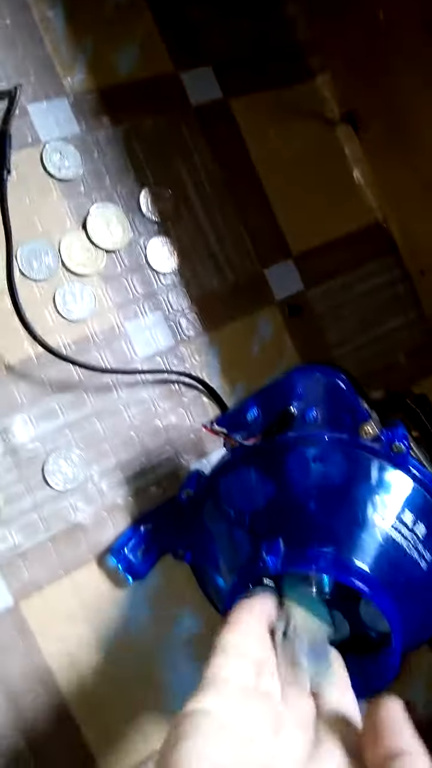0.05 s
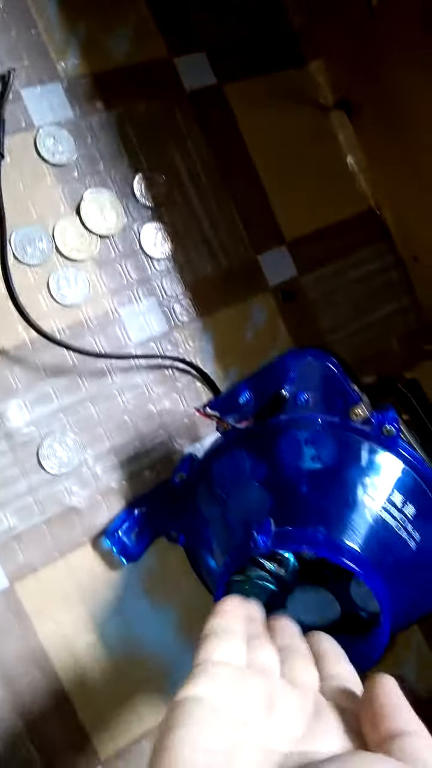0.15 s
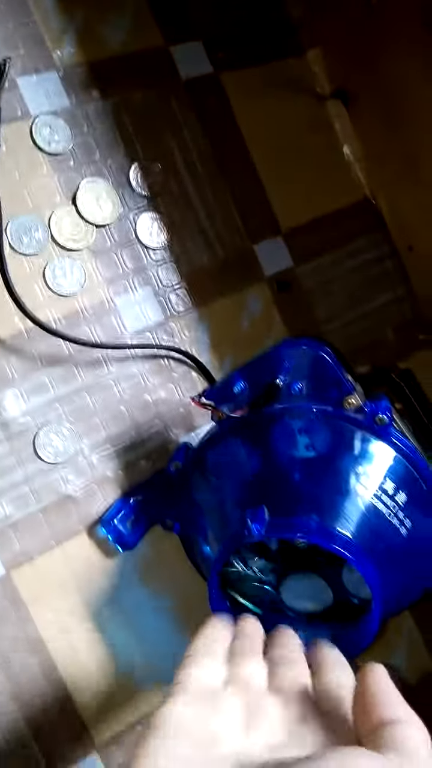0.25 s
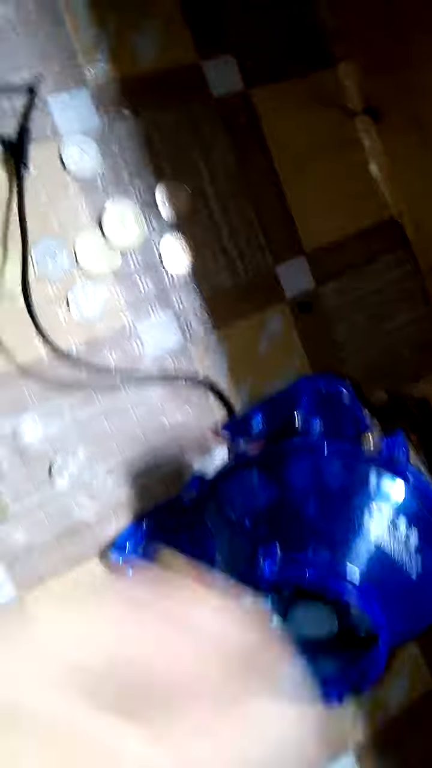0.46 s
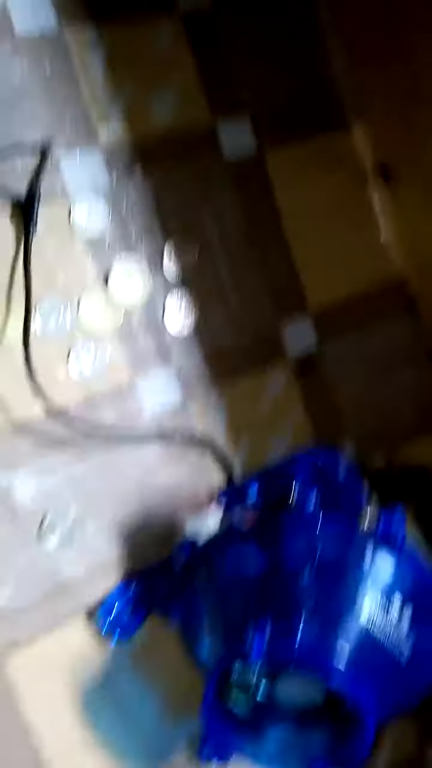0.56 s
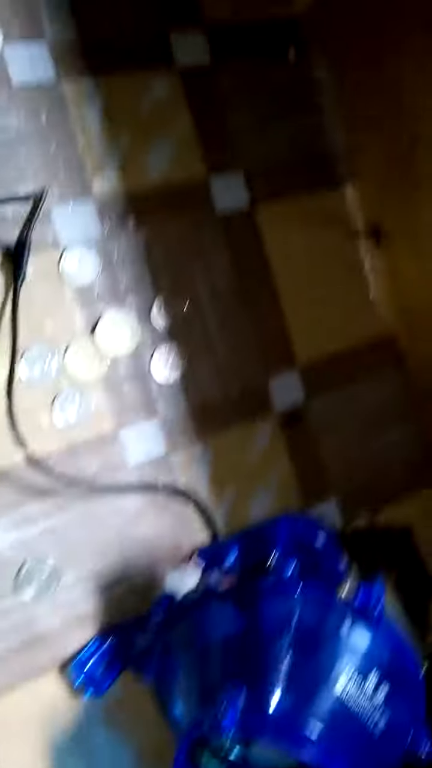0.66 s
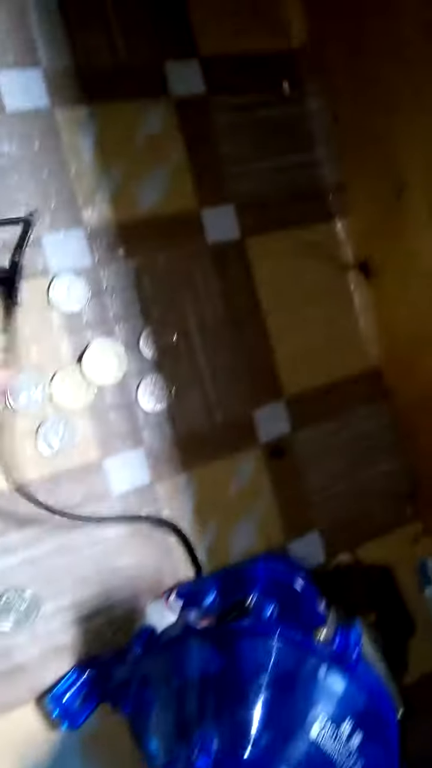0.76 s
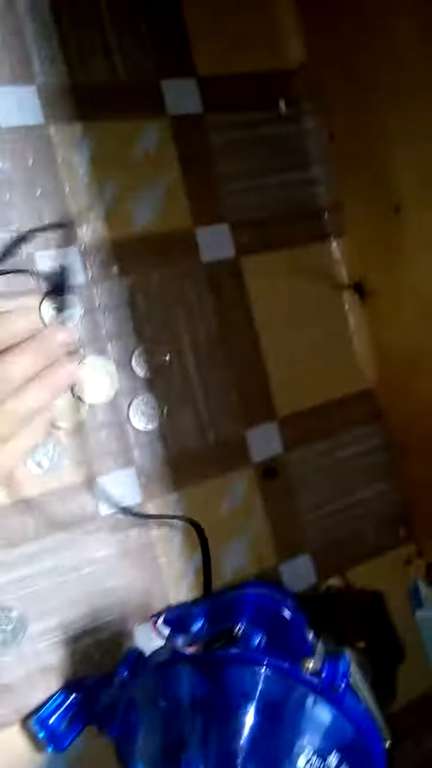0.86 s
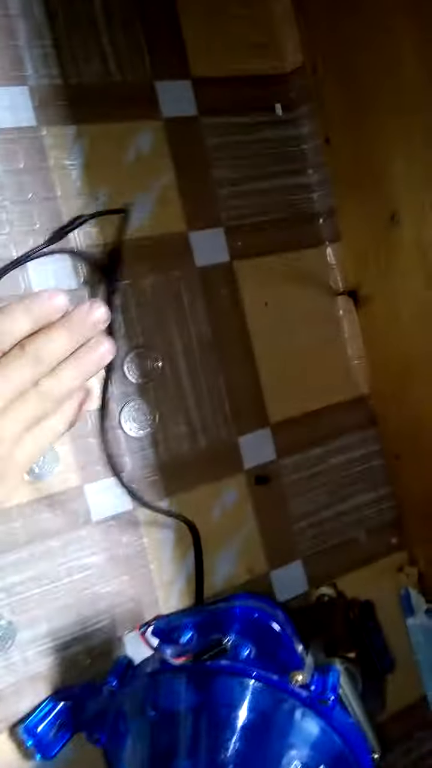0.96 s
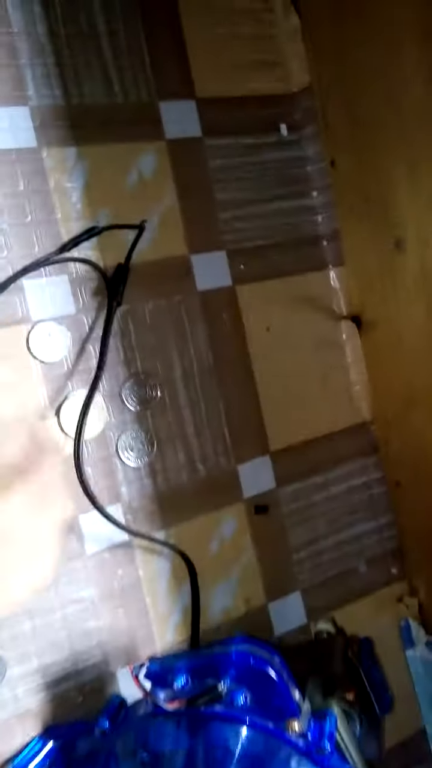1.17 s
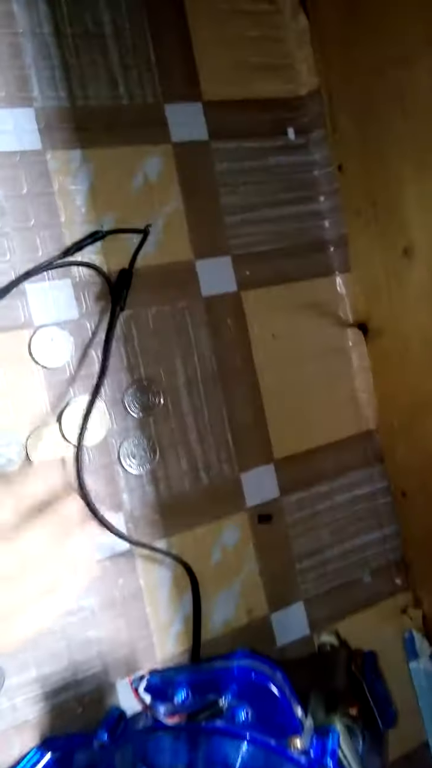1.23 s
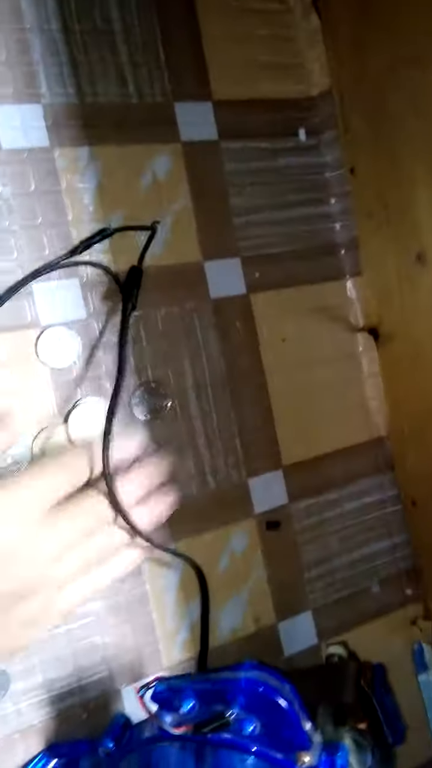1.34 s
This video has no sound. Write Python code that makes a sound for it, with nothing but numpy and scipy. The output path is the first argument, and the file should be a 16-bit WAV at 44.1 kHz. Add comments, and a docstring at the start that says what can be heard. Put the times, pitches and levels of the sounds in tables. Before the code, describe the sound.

Several metal coins clatter into a plastic hopper, ring briefly and settle in weakening bounces

```python
"""On a table in a small room, a few coins shift in a hand, then drop into a plastic hopper.
They clatter on its wall and on each other, ring briefly while airborne and settle in ever weaker bounces.
Contacts are coloured noise bursts; hopper modes and free coins are decaying sines; the heap is a crowd of ticks.
Soft handling bumps, a hand brushing over the table and a faint hiss, all shaped noise, lie underneath."""
import sys
import numpy as np
from scipy import signal
from scipy.fft import rfft, irfft, next_fast_len
from scipy.io import wavfile

SR = 44100
rng = np.random.default_rng(int(sys.argv[2]) if len(sys.argv) > 2 else 0)


def inscribe(sig):
    """Save sig as 16-bit PCM at rate SR to the path in sys.argv[1].

    A 1-D sig is mono; a 2-D sig holds one channel per row.
    Samples are clipped to [-1, 1] before scaling.
    """
    pcm = np.round(np.clip(np.atleast_2d(sig).T, -1, 1) * 32767)
    wavfile.write(sys.argv[1], SR, pcm.astype(np.int16))


N = 61739
T = np.arange(N) / SR   # seconds

# Soft handling bumps. Each row: start in seconds, level in dB, length in seconds.
HANDLING_BUMPS = [(.0, -54, .035), (0.113, -45.5, 0.0245), (0.128, -39, 0.039), (0.19, -41, 0.039),
                  (0.231, -45, .045), (0.352, -37.5, 0.061), (0.43, -38, 0.057), (0.492, -42.5, 0.021),
                  (0.644, -54, 0.044), (0.767, -47.5, .062), (1.16, -53, .025), (1.24, -55.5, .04),
                  (1.325, -53, .069)]
# Dull tone of a bump. Each row: frequency in Hz, relative density in dB per Hz.
BUMP_COLOUR = [(25, -33.5), (50, -7.5), (75, 4), (125, 0.5), (200, -6.5), (300, -17), (600, -43),
               (3000, -87)]

# Tone of the background hiss. Each row: frequency in Hz, relative density in dB per Hz.
HISS_COLOUR = [(25, -36), (70, -2.5), (150, 3), (240, -1), (380, -7), (700, -7), (1200, -8), (2500, -6),
               (3600, -5), (4900, 1), (6200, -9), (7200, -20.5), (8300, -39), (14000, -38), (15500, -50.5)]
HISS_DB = -49.5

# Coins touch each other, away from the hopper. Each row: start in seconds, relative level in dB.
COIN_CLINKS = [(.004, -42), (0.0378, -32), (0.039, -28), (0.0429, -28.5), (0.05, -37), (0.068, -41),
               (0.108, -40), (0.118, -38.5), (.125, -36.5), (.133, -41), (0.1626, -37.5), (0.169, -37)]
# Metallic tone of a clink. Each row: frequency in Hz, relative density in dB per Hz.
CLINK_COLOUR = [(1000, -45.5), (2200, -17), (3300, -6), (4500, 4.5), (5700, 4), (7000, -5.5), (8500, -9),
                (10800, -6.5), (12000, -16), (13300, 8.5), (14200, -9.5), (15500, -12)]
# A coin is left free to ring until it is touched again. Each row: start in seconds, pitch in Hz,
# relative level in dB, free 60 dB decay time in seconds, moment it is damped in seconds.
FREE_RINGS = [(.001, 13080, -46, 0.17, 0.028), (.04, 13380, -37.5, 0.16, 0.11),
              (.122, 12740, -32, 0.12, 0.24), (.126, 13080, -41, 0.51, 0.31),
              (.2275, 13080, -32, 0.15, 0.282), (.2425, 12740, -22, .1, .275),
              (.2453, 4596, -18, .08, 0.41), (.2552, 3410, -13.5, 0.048, 0.39),
              (.2552, 13330, -23, .3, 0.3), (.281, 13345, -14.5, 0.11, 0.308),
              (.3165, 13320, -12, 0.031, .335), (.351, 12740, -40, 0.37, 0.46),
              (.509, 13090, -41.5, 0.2, 0.69), (.5386, 12750, -40.5, 0.14, 0.7),
              (.509, 5150, -22, .03, .535), (.5386, 4970, -28, .05, 0.62), (.606, 4880, -34, .09, 0.78)]
TWIN_HZ, TWIN_DB = 43, -6   # each coin has a second mode close above, which makes it beat
RING_RISE_S, DAMPED_T60_S = 0.0023, .03
TUMBLE_HZ, TUMBLE_DB = 130, 1.5   # the ring flutters as the coin tumbles: top speed, rms depth

# Coins strike the hopper. Each row: start in seconds, relative level in dB, then in dB on top of that level
# the hollow body, the bright edge and the ring of the upper modes.
HOPPER_STRIKES = [(.2275, -16, 4.5, 10.5, -20), (.2425, -11.5, -2, 7, -8), (.2453, -7.5, 1.5, -10, 5),
                  (.2552, -8, 4, -6, -6), (.2765, -4, -4, 6.5, -6), (.285, -12, 6, -2, 4),
                  (.293, -3.5, 0, 14.5, 8), (.2985, -3, -3, -5, 1), (.302, -12.5, 5, 18.5, 15),
                  (.308, -6.5, 0.5, -5, 13), (.3112, -4, -1, 14.5, -15), (.3165, 2, -8, 5, -4),
                  (.3212, -4.5, -7, -4.5, -8), (.3315, -8.5, 3, 5, 2.5), (.338, -6.5, 1.5, -18, 10),
                  (.3475, -11, -1, 4, -21), (.351, -15.5, 4, -4.5, 3), (0.3638, -10, -12, -9, -9),
                  (.3685, -19.5, 4.5, -12, -18), (.379, -20, 1, 12, -5), (.3935, -14.5, 2, -13, -28),
                  (.412, -36, 14.5, -9, -4), (.4175, -21, 6, -15, 0), (.438, -40.5, 20.5, 24, 11),
                  (.4595, -18, -5.5, -17, 12), (0.4614, -18.5, -18, -11, 3), (.478, -30.5, 8, -3.5, 7),
                  (.484, -27.5, 6.5, -8, -9), (.509, -23.5, 8.5, -3.5, -18), (.526, -33, 13.5, -14, -11.5),
                  (.535, -24.5, 6, -10.5, -10), (.5395, -28.5, 9.5, -8, 10.5), (.577, -26, 6, 4, -4),
                  (.587, -39, 6, -8.5, -15), (.606, -27.5, 10.5, -19, 0.5), (.617, -39, 12, -13.5, -3.5),
                  (.637, -33.5, 8, -12.5, -3)]
# Strong modes of the coin-filled hopper. Each row: frequency in Hz, relative level in dB,
# 60 dB decay time in seconds.
HOPPER_MODES = [(715, -28, .06), (800, -23, .04), (1340, -33, .05), (2200, -34, .07), (2620, -29, .09),
                (2861, -28, .1), (2976, -28, .08), (3397, -21, .09), (3494, -24, .08), (3840, -24, .1),
                (3913, -26, .08), (4318, -25, .1), (4536, -24, .07), (4612, -22, .09), (4750, -23, .09),
                (5122, -25, .08), (5388, -27, .06)]
HOLLOW_MODES_DB, RINGING_MODES_DB, MODE_SPREAD_DB = 1, 0, 1.5
HOLLOW_BELOW_HZ = 2000
# Hollow knock of the body. Each row: frequency in Hz, relative density in dB per Hz.
BODY_COLOUR = [(150, -27), (420, -34), (610, -22), (725, 1), (815, 2.5), (930, -3.5), (1080, -9.5),
               (1350, -5), (1600, -10), (1900, -6), (2400, -10.5), (3000, -32.5)]
# Hard clack of the hit. Each row: frequency in Hz, relative density in dB per Hz.
CLACK_COLOUR = [(1000, -32), (1900, -20), (2350, -15.5), (2700, -5.5), (3100, -5), (3400, -1.5),
                (3700, -4.5), (4600, 1), (5700, -5.5), (6800, -14), (8200, -31.5), (12000, -50.5)]
# Bright edge of the hit. Each row: frequency in Hz, relative density in dB per Hz.
EDGE_COLOUR = [(5000, -17.5), (7500, 3.5), (9000, -4.5), (11000, 6.5), (12200, -7), (13200, 13.5),
               (14200, 0), (15500, -20.5)]
BODY_DB, CLACK_DB, EDGE_DB = -15.5, -3.5, -29.5
BODY_T60_S, CLACK_T60_S, EDGE_T60_S, CLINK_T60_S = 0.032, 0.018, 0.028, 0.029

# Every contact builds up quickly, chatters, has one short echo, then decays.
CHATTER_START_SHARE, CHATTER_RISE_S, CHATTER_S = 0.69, 0.0021, 0.0022
# Longest delay of the short echo; each contact draws half to all of it at random.
LONGEST_ECHO_S, ECHO_SHARE = 0.000916, 0.36

# Tone of coins jostling in the heap. Each row: frequency in Hz, relative density in dB per Hz.
JOSTLE_COLOUR = [(600, -32), (1200, -17), (2500, -4.5), (3800, 0), (4800, -9), (6500, -5.5), (8300, -17.5),
                 (11500, -21.5), (13300, -5.5), (15500, -22.5)]
JOSTLE_START_S, JOSTLE_PEAK_S, JOSTLE_T60_S = .284, 0.316, 0.19
JOSTLES_PER_S, JOSTLE_SPREAD_DB, JOSTLE_DB = 1800, 2, -20   # mean rate, spread of touches, rms before fading

# Loudness curve of the hand on the table. Each row: time in seconds, level in dB.
BRUSH_CURVE = [(.88, -79.5), (.93, -68), (.98, -59), (1.02, -50.5), (1.06, -50), (1.09, -45), (1.15, -53),
               (1.19, -60.5), (1.22, -54.5), (1.28, -58.5), (1.4, -56.5)]
# Fingers scuff the table. Each row: start in seconds, relative level in dB.
FINGER_SCUFFS = [(0.933, -45), (1.018, -45), (1.041, -43.5), (1.087, -45.5), (1.112, -48), (1.174, -53.5),
                 (1.36, -44.5)]
# Tone of skin on the table. Each row: frequency in Hz, relative density in dB per Hz.
BRUSH_COLOUR = [(30, -27), (90, -21), (190, 8.5), (330, -5), (470, -3.5), (550, 8), (660, -8.5), (900, -8),
                (2500, -16), (4000, 5), (5500, 5), (8000, -24), (13500, -27), (15500, -32)]
BRUSH_GRAINS_PER_S, SCUFF_T60_S = 8100, 0.028

ROOM_DB, ROOM_T60_S, ROOM_TREBLE_T60_S, ROOM_DELAY_S = -14.5, 0.33, 0.17, .006
ROOM_SPLIT_HZ = 7000
CEILING, CUTOFF_HZ = 0.88, 15500   # full scale is 1


def from_db(db):
    """Decibels to gain."""
    return 10 ** (np.asarray(db) / 20)


def rms_one(x):
    """Scale to rms 1."""
    return x / np.sqrt(np.mean(x ** 2) + 1e-20)


def add(out, s, sound):
    """Mix a sound in from time s on."""
    i = max(int(s * SR), 0)
    out[i:i + len(sound)] += sound[:N - i]


def colour(x, points):
    """Causal minimum-phase filter of unit power gain that follows (Hz, dB) points."""
    size = next_fast_len(2 * N)
    hz, db = np.transpose(points)
    bins_hz = np.fft.rfftfreq(size, 1 / SR)
    curve_db = np.interp(np.log(bins_hz + 1), np.log(hz), db)
    gain = rms_one(from_db(curve_db))
    # folding the cepstrum forward in time gives the phase
    cepstrum = irfft(np.log(gain), size)
    cepstrum[1:size // 2] *= 2
    cepstrum[size // 2 + 1:] = 0
    response = np.exp(rfft(cepstrum))
    return irfft(rfft(x, size) * response, size)[:N]


def dying(t, t60):
    """Exponential decay from time 0, by 60 dB in t60 seconds."""
    return np.exp(-np.log(1000) * np.maximum(t, 0) / t60)


def contacts(times, levels_db, t60):
    """Each contact is a noise burst, like a crowd of damped modes: quick build-up, one short echo, decay."""
    out = np.zeros(N)
    t = T[:SR // 10]
    build_up = np.interp(t, [0, CHATTER_RISE_S], [CHATTER_START_SHARE, 1])
    shape = build_up * dying(t - CHATTER_S, t60)
    shape_rms = np.sqrt(np.mean(shape ** 2))
    for s, db in zip(times, levels_db):
        burst = rng.standard_normal(len(t)) * shape
        echo_s = LONGEST_ECHO_S * rng.uniform(.5, 1)
        echo = np.interp(t - echo_s, t, burst, left=0)
        burst = burst + ECHO_SHARE * echo
        add(out, s, from_db(db) * rms_one(burst) * shape_rms)
    return out


def handling():
    """Dull bumps: low rumbling noise that swells and fades along a half sine."""
    out = np.zeros(N)
    for s, db, length in HANDLING_BUMPS:
        count = int(length * SR)
        rumble = rms_one(colour(rng.standard_normal(N), BUMP_COLOUR)[-count:])
        swell = np.sin(np.linspace(0, np.pi, count))
        add(out, s, from_db(db) * rumble * swell)
    return out


def background_hiss():
    """Steady coloured noise."""
    return from_db(HISS_DB) * colour(rng.standard_normal(N), HISS_COLOUR)


def free_rings():
    """An untouched coin rings in two close modes that beat, flutters as it tumbles, and is damped by a touch."""
    out = np.zeros(N)
    slow = signal.butter(2, TUMBLE_HZ, fs=SR, output="sos")
    for s, hz, db, t60, damped_s in FREE_RINGS:
        main = np.sin(2 * np.pi * hz * T)
        twin = np.sin(2 * np.pi * ((hz + TWIN_HZ) * T + rng.random()))
        pair = main + from_db(TWIN_DB) * twin
        flutter = rms_one(signal.sosfilt(slow, rng.standard_normal(N)))
        rise = 1 - np.exp(-T / RING_RISE_S)
        damping = dying(s + T - damped_s, DAMPED_T60_S)
        envelope = rise * dying(T, t60) * damping
        add(out, s, from_db(db + TUMBLE_DB * flutter) * pair * envelope)
    return out


def coins():
    """Light metal clinks of coin on coin, and the ring of free coins."""
    clinks = contacts(*np.transpose(COIN_CLINKS), CLINK_T60_S)
    return colour(clinks, CLINK_COLOUR) + free_rings()


def hopper_modes(s, db, body_db, ring_db):
    """Each strike kicks the hopper's own modes, which sound as decaying sines."""
    out = np.zeros(N)
    for hz, mode_db, t60 in HOPPER_MODES:
        hollow = hz < HOLLOW_BELOW_HZ
        share_db = body_db + HOLLOW_MODES_DB if hollow else ring_db + RINGING_MODES_DB
        chance_db = MODE_SPREAD_DB * rng.standard_normal(len(s))
        polarity = rng.choice([-1, 1], len(s))
        clicks = np.zeros(N)
        clicks[(s * SR).astype(int)] = polarity * from_db(db + share_db + mode_db + chance_db)
        mode = np.sin(2 * np.pi * hz * T) * dying(T, t60)
        out += signal.fftconvolve(clicks, mode)[:N]
    return out


def hopper():
    """Coins hit plastic: a hollow knock, a hard clack, a bright edge and the hopper's own modes."""
    s, db, body_db, edge_db, ring_db = np.transpose(HOPPER_STRIKES)
    knock = colour(contacts(s, db + body_db + BODY_DB, BODY_T60_S), BODY_COLOUR)
    clack = colour(contacts(s, db + CLACK_DB, CLACK_T60_S), CLACK_COLOUR)
    edge = colour(contacts(s, db + edge_db + EDGE_DB, EDGE_T60_S), EDGE_COLOUR)
    return knock + clack + edge + hopper_modes(s, db, body_db, ring_db)


def jostle():
    """Coins rub and tick in the heap: many tiny random touches, fading as it settles."""
    struck = rng.random(N) < JOSTLES_PER_S / SR
    polarity = rng.choice([-1, 1], N)
    strength = from_db(JOSTLE_SPREAD_DB * rng.standard_normal(N))
    touches = struck * polarity * strength
    onset = np.interp(T, [JOSTLE_START_S, JOSTLE_PEAK_S], [0, 1])
    envelope = onset * dying(T - JOSTLE_PEAK_S, JOSTLE_T60_S)
    return from_db(JOSTLE_DB) * colour(rms_one(touches) * envelope, JOSTLE_COLOUR)


def brush():
    """Skin slides over the table in fine random grains and catches now and then in short scuffs."""
    strength = rng.standard_normal(N)
    present = rng.random(N) < BRUSH_GRAINS_PER_S / SR
    grains = rms_one(strength * present)
    slide = grains * from_db(np.interp(T, *np.transpose(BRUSH_CURVE)))
    scuffs = contacts(*np.transpose(FINGER_SCUFFS), SCUFF_T60_S)
    return colour(slide + scuffs, BRUSH_COLOUR)


def room(x):
    """Diffuse reflections: a decaying noise tail whose treble dies sooner."""
    noise = rng.standard_normal(N)
    low = signal.sosfilt(signal.butter(2, ROOM_SPLIT_HZ, fs=SR, output="sos"), noise)
    high = signal.sosfilt(signal.butter(2, ROOM_SPLIT_HZ, "high", fs=SR, output="sos"), noise)
    # the minus sign keeps the two bands from cancelling at the split
    tail = low * dying(T, ROOM_T60_S) - high * dying(T, ROOM_TREBLE_T60_S)
    tail = tail * (T > ROOM_DELAY_S)
    return from_db(ROOM_DB) * signal.fftconvolve(x, tail / np.linalg.norm(tail))[:N]


def scene():
    """Coins and hopper in the room, over handling noise, brushing and hiss."""
    clatter = hopper() + coins() + jostle()
    hiss = background_hiss()
    return (clatter + room(clatter) + handling() + brush() + hiss)[None]


def record(dry):
    """Peaks are rounded smoothly below the ceiling and a steep low-pass cuts the top."""
    rounded = dry / (1 + (dry / CEILING) ** 4) ** .25
    low_pass = signal.ellip(10, .1, 80, CUTOFF_HZ, fs=SR, output="sos")
    return signal.sosfilt(low_pass, rounded)


dry = scene()
out = record(dry)
inscribe(out)
```